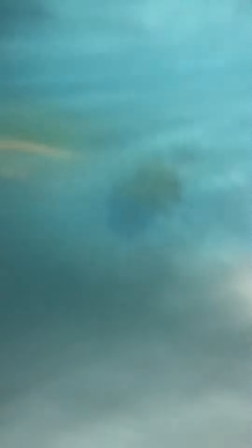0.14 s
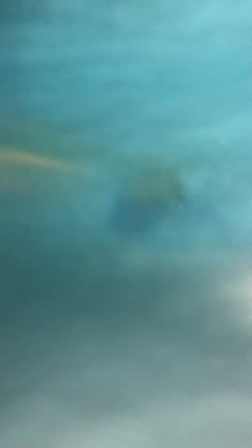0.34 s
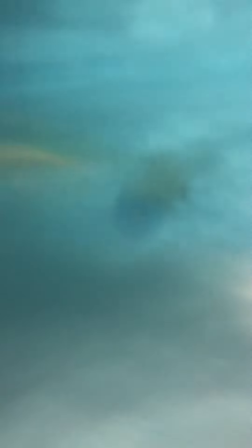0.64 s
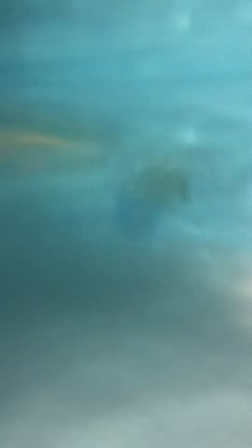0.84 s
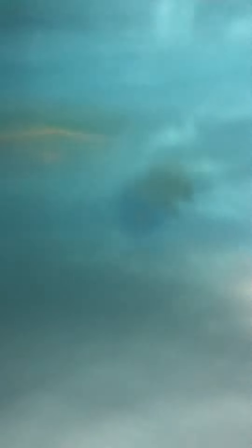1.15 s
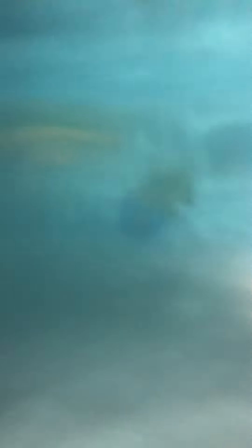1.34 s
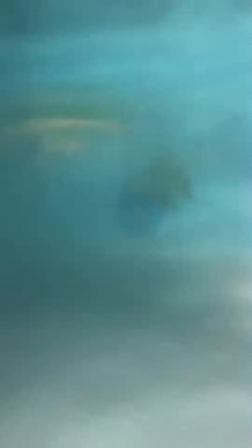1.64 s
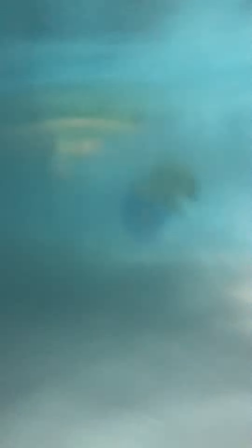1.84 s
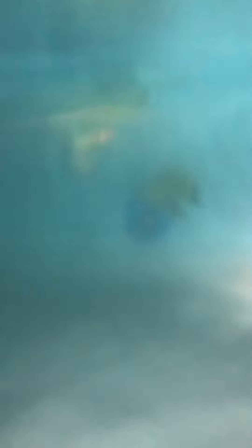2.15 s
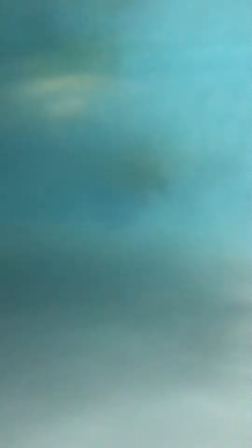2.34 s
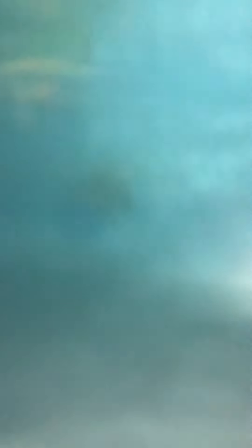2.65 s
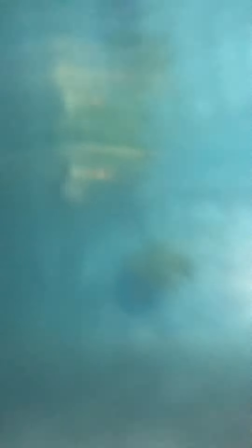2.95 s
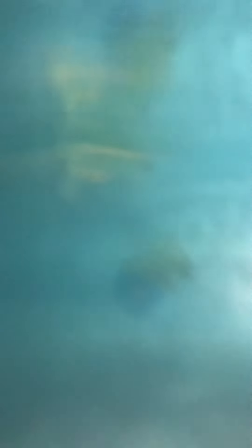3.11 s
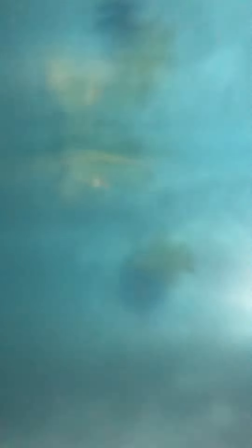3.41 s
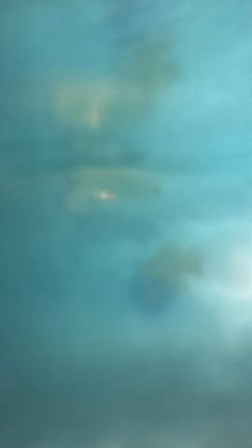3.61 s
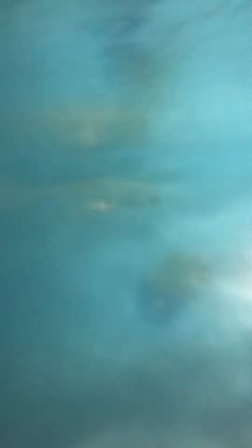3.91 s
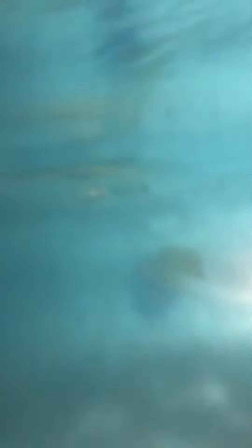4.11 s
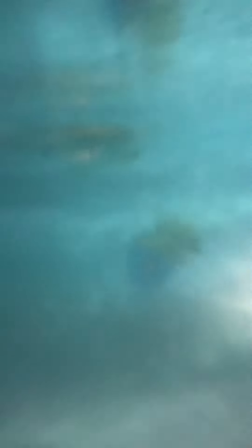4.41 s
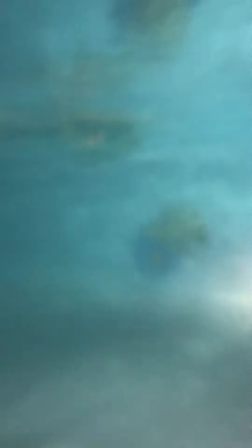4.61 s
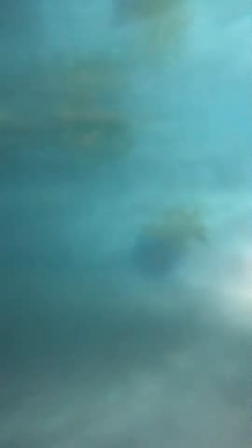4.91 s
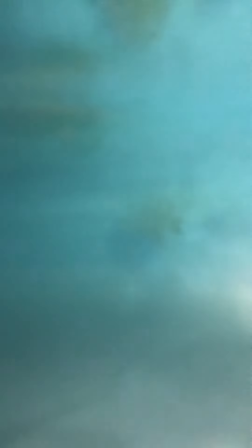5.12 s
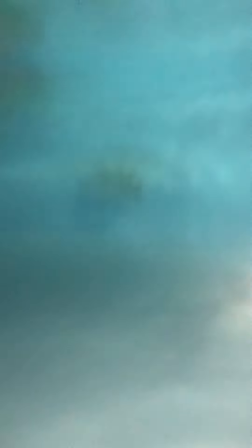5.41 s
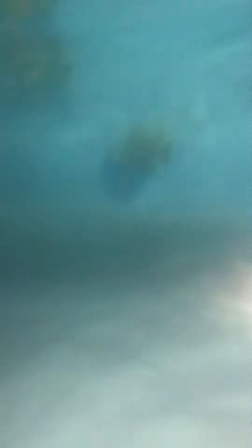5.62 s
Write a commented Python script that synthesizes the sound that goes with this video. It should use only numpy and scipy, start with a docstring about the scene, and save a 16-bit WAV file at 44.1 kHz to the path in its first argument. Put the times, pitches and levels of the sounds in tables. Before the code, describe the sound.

Muffled submerged pump drone with a fast flutter, then dense plastic creaks, knocks and low thumps as the camera moves and water rushes past.

```python
"""Under water in a pool: from the start two pump tones beat over the pump's dull wash, with a faint whistle.
The camera housing soon creaks as it is moved, most densely from about two seconds on. Each creak is a
bending wave, treble first and bass later, built from sinking chirps. Filtered noise makes the water
slosh and surge with the motion; after four seconds it also rushes past in two sweeps."""
import sys
import numpy as np
from scipy import signal
from scipy.fft import rfft, irfft, next_fast_len
from scipy.io import wavfile
from scipy.ndimage import uniform_filter1d, map_coordinates

SR = 44100
rng = np.random.default_rng(int(sys.argv[2]) if len(sys.argv) > 2 else 0)


def transcribe(u):
    """Save the signal u as a 16-bit wav file named by the first command-line argument.

    u: samples, shape (n,) or (channels, n), limited to [-1, 1]; the rate is SR.
    q: integer samples, one column per channel.
    """
    v = np.clip(np.atleast_2d(u).T, -1, 1)
    q = np.round(v * 32767).astype(np.int16)
    wavfile.write(sys.argv[1], SR, q)


N = 254016  # length in samples

# how hard the housing is moved, as a slosh level: time_s [s], motion_db [dB]
MOTION_CURVE = [(0.0, -63.5), (1.6, -56.5), (1.85, -44.5), (2.05, -39.5), (2.15, -43), (2.42, -38),
                (2.62, -49.5), (2.8, -27), (2.94, -47), (3.1, -46), (3.25, -40.5), (3.33, -50),
                (3.6, -35.5), (3.7, -44), (3.79, -33.5), (3.86, -41.5), (4.25, -42), (4.6, -46.5),
                (4.8, -45.5), (4.88, -35.5), (5.04, -40), (5.14, -43.5), (5.24, -29.5), (5.32, -39),
                (5.38, -31), (5.55, -40), (5.76, -50.5)]
# water streaming past the housing in two sweeps: time_s [s], stream_db [dB]
STREAM_CURVE = [(0.0, -74.5), (4.0, -74), (4.2, -50.5), (4.4, -68), (4.8, -68), (4.88, -51), (4.97, -57),
                (5.04, -45), (5.14, -48.5), (5.26, -41.5), (5.42, -44), (5.6, -59), (5.76, -63)]


def amp(db):
    """Gain of a level in dB."""
    return 10 ** (np.asarray(db) / 20)


def unit(x):
    """x at rms 1."""
    return x / np.sqrt(np.mean(x ** 2) + 1e-20)


def curves(rows):
    """One value per sample for each column after the time."""
    time_s, *columns = np.transpose(rows)
    t = np.arange(N) / SR
    return [np.interp(t, time_s, column) for column in columns]


def wobble(rate):
    """A smooth random curve, rate knots a second."""
    knots = rng.standard_normal(int(N * rate / SR) + 4)
    return map_coordinates(knots, [np.arange(N) * rate / SR])


def filtered(x, response):
    """x times a response of frequency, with zero padding against wrap-around."""
    size = next_fast_len(N + 8192)
    spectrum = rfft(x, size) * response(np.fft.rfftfreq(size, 1 / SR))
    return irfft(spectrum, size)[..., :N]


def noise(spectrum, patchy_db):
    """Coloured noise of rms 1 with patches of random gain in time and frequency."""
    cells = signal.stft(rng.standard_normal(N), nperseg=512)[2]
    patches = uniform_filter1d(rng.standard_normal(cells.shape), size=6, axis=0)
    patches = uniform_filter1d(patches, size=8, axis=1)
    x = signal.istft(cells * amp(patchy_db * unit(patches)), nperseg=512)[1][:N]
    f, level_db = np.transpose(spectrum)
    return unit(filtered(x, lambda hz: amp(np.interp(np.log(hz + 1), np.log(f + 1), level_db))))


def chirps(s, db, hz, cycles, fall, steep, size):
    """Wave packets that crest at s with pitch hz; fall sets how fast the pitch sinks, steep how fast the tail dies."""
    rise = (np.clip(cycles, .3, 30) / hz / 3)[:, None]
    u = np.arange(size) / SR / rise
    envelope = (u * np.exp(1 - u)) ** steep
    # the pitch passes hz at the crest (u = 1)
    turns = hz[:, None] * rise * (1 - np.exp(-fall * (u - 1))) / fall
    start = rng.uniform(0, 2 * np.pi, (len(s), 1))
    wave = amp(db)[:, None] * envelope * np.cos(2 * np.pi * turns + start)
    at = np.round((s[:, None] - rise) * SR).astype(int) + np.arange(size)
    # overlapping packets add up; what runs past the end lands in a spare sample
    return np.bincount(np.clip(at, 0, N).ravel(), wave.ravel(), N + 1)[:N]


def follows(level_db, per_motion, per_stream, calm_db):
    """Level in dB of a layer that motion and stream drive in dB per dB, never under its calm level."""
    brisk_db, still_db = -42, -78  # motion and stream at which the layer has level_db
    (motion_db,), (stream_db,) = curves(MOTION_CURVE), curves(STREAM_CURVE)
    driven_db = level_db + per_motion * (motion_db - brisk_db) + per_stream * (stream_db - still_db)
    return np.maximum(driven_db, calm_db)


def pump():
    """Two close tones beat, over weak orders and a wash; levels sink as the housing turns away, the wash least."""
    # the two tones: time_s [s], beat_hz [beats per s], lower_db [dB rms], upper_db [dB rms]
    tone_rows = [(0.0, 22.0, -33.5, -37.5), (0.9, 22.1, -33, -37.5), (1.9, 21.45, -34, -38.5),
                 (2.4, 22.0, -35, -37), (2.9, 21.55, -38, -39), (3.4, 21.55, -39, -43),
                 (3.84, 22.05, -44, -53), (4.32, 22.05, -40, -46), (4.8, 21.9, -40, -41),
                 (5.28, 22.1, -39, -45), (5.76, 21.75, -41, -45)]
    # weaker shaft and mains orders: pitch_hz [Hz], level_db [dB rms before the fade]
    order_rows = [(58.8, -57), (120.5, -55), (239.7, -58), (293.7, -57), (354, -67), (720, -72),
                  (1024, -71), (1144, -76), (1264, -77)]
    # colour of the wash: pitch_hz [Hz], density_db [relative dB per Hz]
    wash_colour = [(20, -41), (55, -5), (130, -2), (280, -8), (600, -19), (1100, -19), (1550, -55),
                   (2200, -23), (3700, -31), (6500, -38), (8000, -44), (10500, -50.5), (16000, -53.5)]
    upper_hz = 188.66
    together_s = 0.0318  # both tones crest together at this moment
    beat_hz, lower_db, upper_db = curves(tone_rows)
    t = np.arange(N) / SR

    out = 0
    for hz, db in (upper_hz - beat_hz, lower_db), (np.full(N, upper_hz), upper_db):
        turns = np.cumsum(hz) / SR
        turns = turns - np.interp(together_s, t, turns)
        out = out + amp(db + 0.58 * wobble(6.8)) * np.sqrt(2) * np.cos(2 * np.pi * turns)

    fade_db = lower_db - lower_db[0]
    for hz, db in order_rows:
        drift = .3 * wobble(2)  # phase, radians
        gain = amp(db + fade_db + wobble(2.6)) * np.sqrt(2)
        out = out + gain * np.cos(2 * np.pi * hz * t + drift)
    wash = amp(-48.5 + 0.14 * fade_db) * noise(wash_colour, patchy_db=2.5)
    return out + wash


def housing():
    """All sounds of the moved housing: clear knocks, with fine crackle and small gulps between them."""
    return knocks() + crackle_and_gulps()


def knocks():
    """The clear creaks, each with its late thud as bass travels slower, and the further low thumps."""
    # creaks: crest_s [s], peak_db [dB, main chirp], pitch_hz [Hz], tick_db [dB against peak_db, before
    # each tick's own offset], thud_db [dB, peak of the main swing], thud_hz [Hz]
    creak_rows = [(0.4245, -27.5, 1970, -37, -17.5, 477), (0.49, -25.5, 2270, -23, -23.5, 352),
                  (1.778, -42, 1490, -28, -33, 396), (1.89, -27.5, 2310, -25, -23.5, 337),
                  (2.0, -41.5, 1900, -31, -27, 314), (2.026, -25, 2360, -17.5, -43, 345),
                  (2.043, -19.5, 1980, -21, -21.5, 424), (2.069, -24, 2144, -20, -22, 330),
                  (2.078, -27.5, 2280, -19, -15, 257), (2.166, -32, 1150, -11.5, -23.5, 403),
                  (2.198, -34, 2120, -17, -27.5, 325), (2.261, -33, 2240, -16, -27.5, 305),
                  (2.391, -35, 1340, -39, -18, 505), (2.407, -27, 1100, -43, -19.5, 403),
                  (2.437, -15, 2200, -18, -11.5, 291), (2.476, -41, 1100, -23, -22, 283),
                  (2.489, -25, 1910, -13, -21.5, 360), (2.511, -28, 1115, -22, -30, 453),
                  (2.521, -33, 1570, -11, -34, 400), (2.54, -31, 1994, -26, -25.5, 327),
                  (2.571, -28, 1500, -5.5, -35, 400), (2.666, -22, 2200, -19, -12.5, 248),
                  (2.707, -35, 1810, -33, -25, 311), (2.792, -27, 1870, -28, -29.5, 330),
                  (2.803, -21.5, 1450, -8.5, -24, 394), (2.823, -24, 1060, -15, -15, 318),
                  (2.84, -25, 1215, -27, -3, 344), (2.87, -30.5, 2150, -7.5, -23, 330),
                  (3.205, -30, 1900, -26.5, -26.5, 392), (3.408, -23.5, 1940, -30, -17, 425),
                  (3.456, -22, 2050, -25, -24.5, 400), (3.503, -33, 1080, -37, -35, 500),
                  (3.573, -25.5, 893, -29, -8.5, 545), (3.632, -40.5, 2200, -8, -24, 332),
                  (3.656, -39, 2000, -9.5, -39, 400), (3.68, -34, 1150, -36, -32, 507),
                  (3.741, -27, 2230, -17.5, -38, 400), (3.761, -23, 1130, -21.5, -32, 695),
                  (3.774, -28, 1310, -19, -29, 480), (3.789, -24, 2190, -39, -29, 400),
                  (3.799, -27.5, 1390, -21, -39, 450), (3.806, -20, 1004, -29, -18.5, 700),
                  (3.829, -33, 2330, -35, -34, 400), (3.886, -24.5, 1590, -18, -34, 584),
                  (3.947, -31.5, 1130, -41, -18, 494), (3.991, -34.5, 1410, -15, -32, 450),
                  (4.012, -31, 1090, -17.5, -24.5, 466), (4.066, -32, 1150, -20, -33.5, 495),
                  (4.09, -31.5, 1450, -37, -39, 500), (4.157, -33, 1250, -18, -27.5, 410),
                  (4.28, -25, 2120, -23.5, -22, 410), (4.298, -27, 2110, -21, -22, 518),
                  (4.576, -39.5, 2000, -30, -30.5, 415), (4.767, -21, 1940, -16.5, -20, 340),
                  (4.91, -31.5, 1140, -34, -29, 300), (4.938, -39, 1930, -20, -39, 400),
                  (4.961, -8, 1966, -12.5, -6.5, 390), (5.246, -18.5, 2190, -33, -10.5, 369),
                  (5.288, -38, 1780, -24, -22.5, 350), (5.359, -25.5, 1560, -33, -24, 391),
                  (5.367, -15.5, 1020, -43, -18.5, 312), (5.389, -11, 1850, -14.5, -41, 700),
                  (5.488, -25, 2050, -13.5, -19, 345), (5.525, -15, 1420, -38, -21.5, 427),
                  (5.69, -36, 2120, -31, -39, 403)]
    # further dull thumps, many just after a creak: crest_s [s], peak_db [dB, main swing], pitch_hz [Hz]
    thump_rows = [(0.437, -19.5, 217), (0.445, -23.5, 99), (2.054, -26, 103), (2.309, -28, 452),
                  (2.42, -21, 270), (2.449, -25.5, 108), (2.528, -25, 110), (2.686, -28.5, 80),
                  (2.801, -19.5, 94), (3.245, -27, 363), (3.262, -23.5, 358), (3.428, -19.5, 260),
                  (3.523, -30.5, 417), (4.148, -26, 378), (4.312, -24.5, 430), (4.803, -19, 340),
                  (4.894, -26, 370), (4.926, -20.5, 102), (4.984, -25.5, 74.7), (5.011, -24, 360),
                  (5.036, -23, 318), (5.263, -25.5, 92), (5.312, -27, 307), (5.6, -26.5, 460),
                  (5.622, -22.5, 390)]
    lag_cycles = 1.623  # the bass arrives this many of its own cycles late
    s, db, hz, tick_db, thud_db, thud_hz = np.transpose(creak_rows)
    creaks = creak(s, db, hz, tick_db)
    late_thuds = thud(s + lag_cycles / thud_hz, thud_db, thud_hz)
    return creaks + late_thuds + thud(*np.transpose(thump_rows))


def crackle_and_gulps():
    """Small creaks at random moments, a fifth of them joined by a low gulp; both grow with the motion."""
    (motion_db,) = curves(MOTION_CURVE)
    crackle_db = follows(-53.5, per_motion=0.99, per_stream=-0.27, calm_db=-62.5)
    d = rng.random((1500, 4))
    s = 0.018 + 5.7 * d[:, 0]
    at = (s * SR).astype(int)
    size_db = -3.8 * np.log(d[:, 1] + 0.006)  # many small, few large
    stir = np.clip((motion_db[at] + 62) / 14, .4, 1)  # sizes differ less in calm
    pitch = 2400 * np.exp(-.9 * d[:, 2] ** 2)
    crackle = creak(s, crackle_db[at] + size_db * stir, pitch, -30 + 22 * d[:, 3])

    gulp_db = motion_db[at[:300]] - 2.5 + size_db[300:600]
    gulps = thud(s[:300], gulp_db, 260 * np.exp(1.127 * d[:300, 2]))
    return crackle + gulps


def creak(s, db, hz, tick_db):
    """A ringing chirp of the housing wall, led by bright ticks and trailed by uneven rebounds."""
    d = rng.standard_normal((len(s), 9))
    cycles = 5.5 * np.sqrt(hz / 2000) + .3 * d[:, 0]
    out = chirps(s, db, hz, cycles, fall=.18, steep=2, size=400)

    # an upper partial, the slower bass of the wave, a late rebound: lag_s, pitch ratio, level_db
    partials = [(-.0004, 1.456, -8.5), (.0014, .52, -6), (.004, .95, -14.5)]
    for k, (lag_s, ratio, level_db) in enumerate(partials):
        pitch = hz * ratio * np.exp(0.14 * d[:, 1 + k])
        late = s + lag_s * np.exp(.25 * d[:, 4 + k])
        level = db + level_db + 2 * d[:, 6 + k]
        out += chirps(late, level, pitch, np.full(len(s), 4.5), fall=.25, steep=2, size=400)

    # the treble arrives first and once more, weaker, with the rebound: lead_s, pitch_hz, level_db
    ticks = [(.0004, 4050, 1.5), (.0004, 6030, -1.5), (.0005, 9930, -22), (.0006, 13040, -28)]
    for k, (lead_s, tick_hz, level_db) in enumerate(ticks):
        pitch = tick_hz * np.exp(0.15 * d[:, 1 + k])
        level = db + tick_db + level_db + 1.6 * d[:, 5 + k]
        out += chirps(s - lead_s, level, pitch, pitch / 700, fall=0.065, steep=1.5, size=250)
        out += chirps(s + 0.0026, level - 15.5, pitch * .93, pitch / 500, fall=0.067, steep=1.1, size=250)
    return out


def thud(s, db, hz):
    """A short low swing of the housing with a ragged after-swing; deeper ones make fewer cycles."""
    d = rng.standard_normal((len(s), 4))
    cycles = 4.77 * (hz / 340) ** 0.074
    swing = chirps(s, db, hz, cycles, fall=.3, steep=7, size=3000)
    after_s = s + 2.633 / hz * np.exp(0.204 * d[:, 0])
    after_db = db - 11.0 + 3 * d[:, 1]
    after_hz = hz * 0.776 * np.exp(0.23 * d[:, 2])
    return swing + chirps(after_s, after_db, after_hz, cycles, fall=0.19, steep=1.9, size=3000)


def water():
    """Low surge, lumpy slosh and hissing rush as shaped noise; the rush follows motion or stream, the louder."""
    # colours of the three layers: pitch_hz [Hz], density_db [relative dB per Hz]
    surge_colour = [(20, -42.5), (45, -3), (100, 2), (150, 0), (230, -27), (400, -92)]
    slosh_colour = [(120, -40), (230, 3.5), (350, 1), (520, -1), (800, -16), (1300, -37), (2500, -92.5)]
    rush_colour = [(400, -38.5), (750, -3.5), (1100, -2), (1600, 0), (2450, -5), (3300, -17), (6000, -27),
                   (7000, -30.5), (9500, -43.5), (16000, -61)]
    (motion_db,), (stream_db,) = curves(MOTION_CURVE), curves(STREAM_CURVE)
    surge_db = follows(-51.5, per_motion=1.04, per_stream=0.19, calm_db=-66) + 2.2 * wobble(14)
    surge = amp(surge_db) * noise(surge_colour, patchy_db=0.5)

    stir = np.clip((motion_db + 62.0) / 12, 0, 1)  # the level lumps vanish in calm water
    lumps_db = stir * (3.5 * wobble(30) + 1.46 * wobble(70))
    slosh = amp(motion_db - 1.0 + lumps_db) * noise(slosh_colour, patchy_db=3.5)

    rush_db = follows(-68, per_motion=1.22, per_stream=0, calm_db=stream_db) + 1.5 * wobble(60)
    rush = amp(rush_db) * noise(rush_colour, patchy_db=1.5)
    return surge + slosh + rush


def whine():
    """A faint whistle high up, from the camera's own circuits: noise in a narrow band near 9 kHz."""
    # pitch_hz, density_db (relative)
    band = [(5000, -88), (8000, -35.5), (8350, -8.0), (8700, -21.5), (8950, -3.5),
            (9000, -1), (9050, 0.0), (9400, -38.5), (11000, -75.0)]
    return amp(-81.5) * noise(band, patchy_db=1.0)


def scene():
    """All sources at the one microphone."""
    return (pump() + whine() + water() + housing())[None]


def record(dry):
    """The camera passes nothing above its band limit."""
    top_hz = 15830
    return filtered(dry, lambda hz: hz < top_hz)


dry = scene()
out = record(dry)
transcribe(out)
```